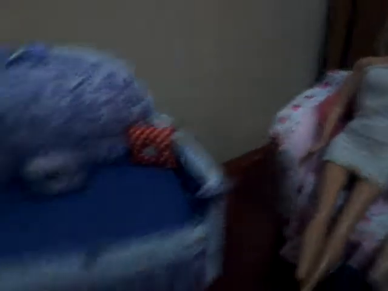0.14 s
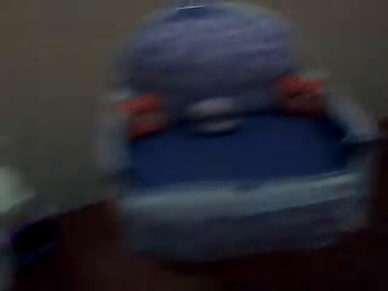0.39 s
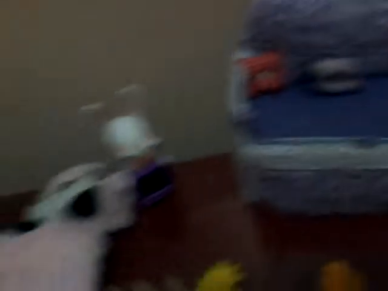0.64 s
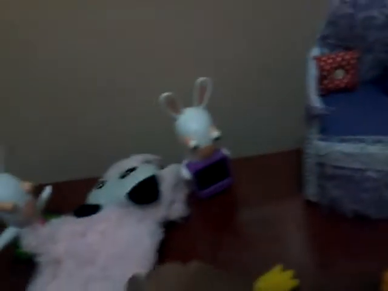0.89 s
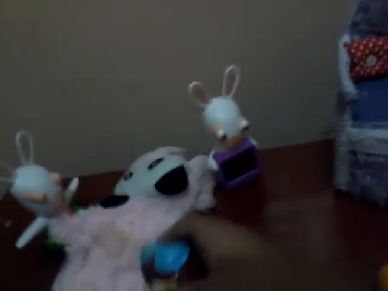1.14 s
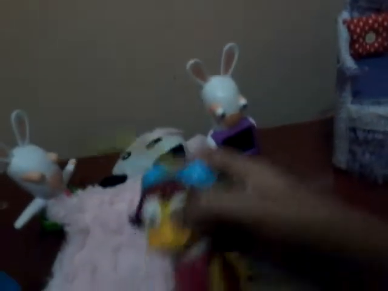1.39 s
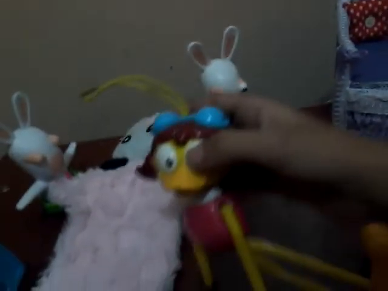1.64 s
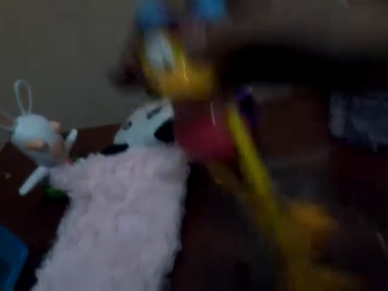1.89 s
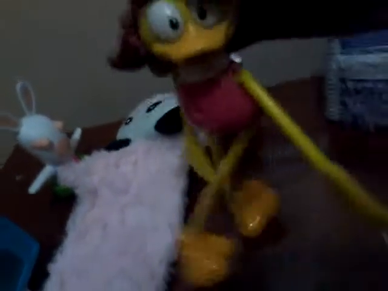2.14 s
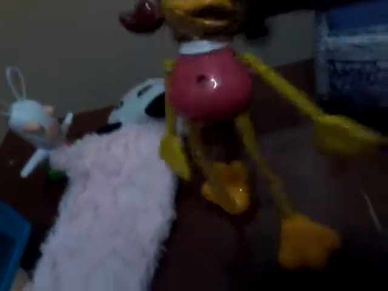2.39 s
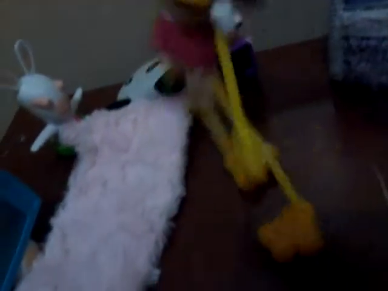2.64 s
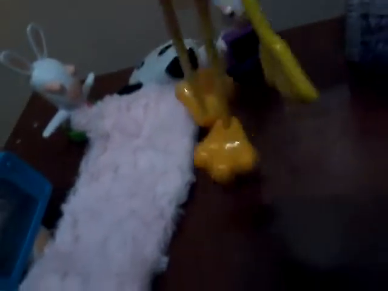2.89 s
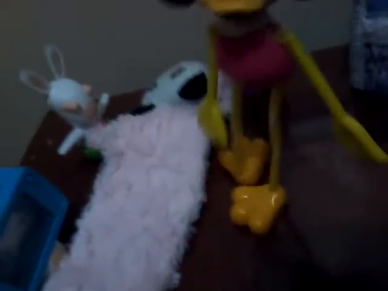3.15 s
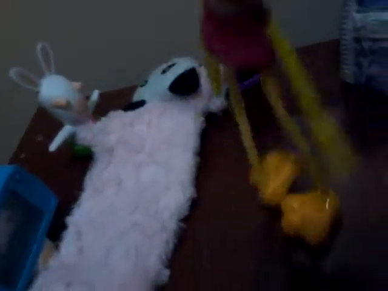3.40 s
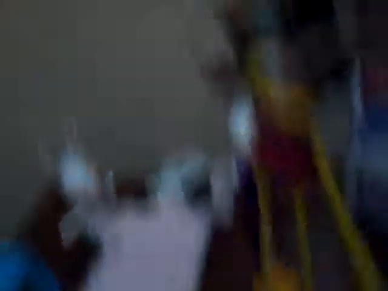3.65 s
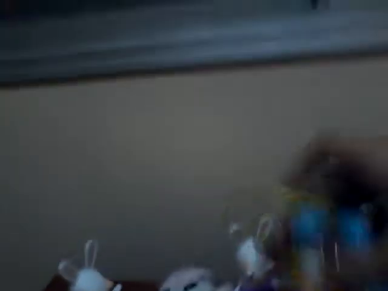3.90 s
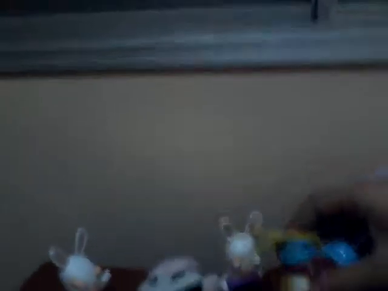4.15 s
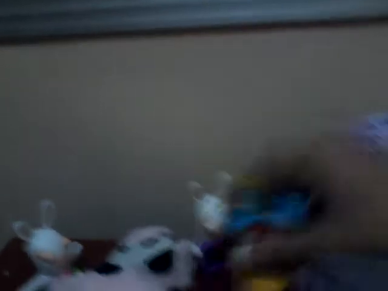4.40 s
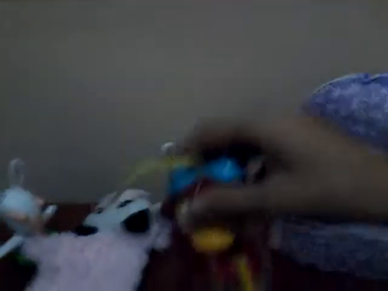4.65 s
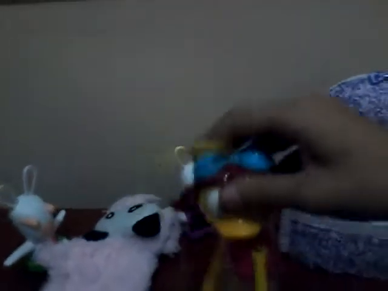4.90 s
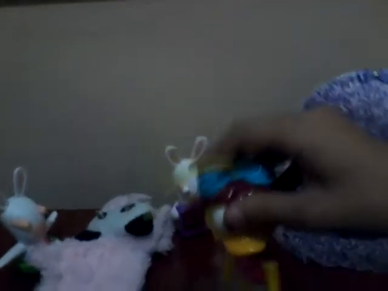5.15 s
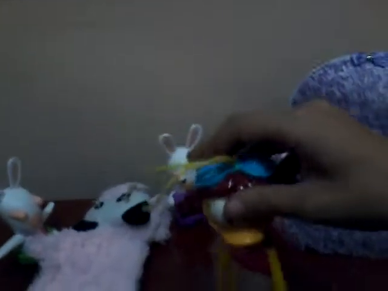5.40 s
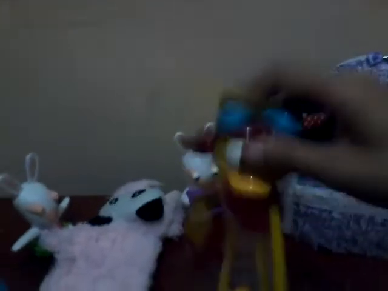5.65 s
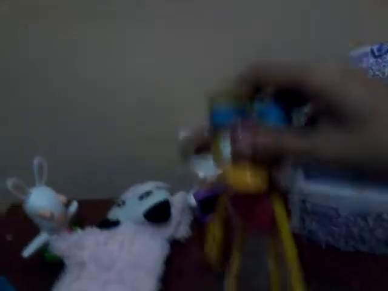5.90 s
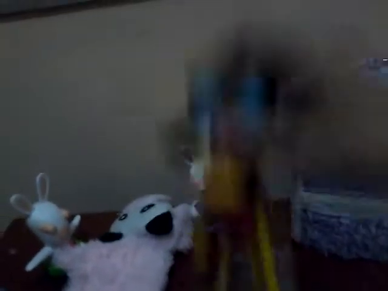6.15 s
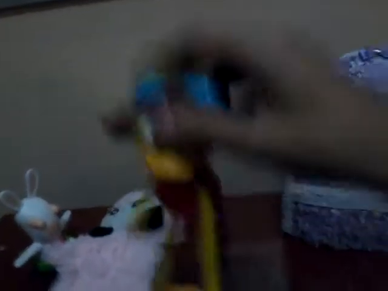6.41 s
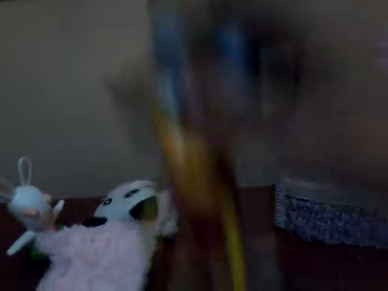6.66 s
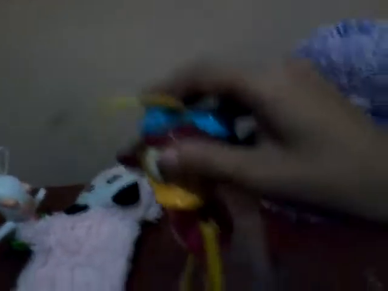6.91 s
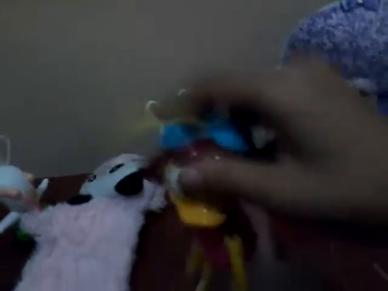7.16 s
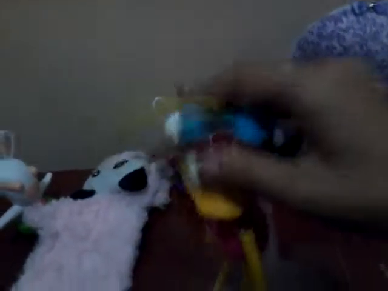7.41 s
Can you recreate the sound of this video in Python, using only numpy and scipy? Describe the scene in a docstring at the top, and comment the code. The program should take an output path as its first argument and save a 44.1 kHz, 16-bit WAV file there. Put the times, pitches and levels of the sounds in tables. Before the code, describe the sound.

Soft rubbing and a few light ticks, then brisk clattering steps of a jointed plastic toy on a table top, close up, over faint hiss.

```python
"""A dangling plastic toy is lifted and walked on a wooden table close to a small camera in a hard, small room.
Low tones hum outside from the start, over preamplifier hiss and a swelling wash of traffic: filtered noise.
Hand and plush then rub softly (noise bands), and limbs and table begin to knock as struck, decaying modes.
A thin scrape passes and a distant engine speeds up, as a sum of harmonics, then drops away.
Steps follow in clusters: hard ticks, the clack of hollow plastic and the knock of the table top."""
import sys
import numpy as np
from scipy import signal
from scipy.fft import rfft, irfft, next_fast_len
from scipy.io import wavfile
from scipy.ndimage import map_coordinates

SR = 44100
rng = np.random.default_rng(int(sys.argv[2]) if len(sys.argv) > 2 else 0)


def store_pcm(level_fs):
    """Save levels as 16-bit WAV."""
    pcm = np.round(np.clip(level_fs, -1, 1) * 32767).astype(np.int16)
    wavfile.write(sys.argv[1], SR, np.atleast_2d(pcm).T)


def makeup_ratio(level_db):
    """Linear amplitude ratio for a level in decibels (20 dB per factor of ten)."""
    decades = np.asarray(level_db, float) / 20
    return 10 ** decades


N = 332514


def unit(x):
    """Normalization of mean power: rms 1."""
    return x / np.sqrt(np.mean(x ** 2) + 1e-20)


def along(points, hz):
    """Interpolation on a logarithmic frequency axis, the scale of pitch."""
    point_hz, value = np.transpose(points)
    return np.interp(np.log(hz + 1), np.log(point_hz + 1), value)


def wobble(rate):
    """Slow random modulation: a smooth curve through normal random knots, rate of them a second."""
    knots = rng.standard_normal(N // 100)
    return map_coordinates(knots, [np.arange(N) * rate / SR])


def noise(spectrum):
    """Spectral shaping: white noise weighted in frequency, then scaled to rms 1."""
    white = rfft(rng.standard_normal(next_fast_len(N)))
    hz = np.linspace(0, SR / 2, len(white))
    return unit(irfft(white * makeup_ratio(along(spectrum, hz)))[:N])


def swell(start, length, rise, fall):
    """Amplitude envelope: rises from start, holds until start + length and then falls (all in s)."""
    t = np.arange(N) / SR - start
    ramp = np.minimum(t / rise, 1 + (length - t) / fall)
    return np.clip(ramp, 0, 1) ** 2


def preamplifier_hiss():
    """Stationary random noise with a fixed spectrum."""
    # hiss spectrum: frequency_hz, relative_density_db
    hiss_spectrum = [(30, -17.5), (120, 7.5), (500, -4), (2000, -10.5), (6000, -15.5), (14500, -13.5),
                     (15200, -46)]
    return makeup_ratio(-64) * noise(hiss_spectrum)


def distant_hums():
    """Gliding tones: phase is the integral of frequency; level and phase waver at random."""
    # low hums: start_s, length_s, first_hz, last_hz, level_db
    hums = [(-0.99, 1.42, 136, 141, -68), (0.73, 2.4, 96, 99.5, -61), (1.1, 3.4, 134, 169, -59.5)]
    rise_s, fall_s = 0.68, 0.32
    t = np.arange(N) / SR
    total = 0
    for s, length, first_hz, last_hz, db in hums:
        hz = np.interp(t, [s, s + length], [first_hz, last_hz])
        phase = 2 * np.pi * np.cumsum(hz) / SR + .8 * wobble(9)
        tone = makeup_ratio(db + 2.5 * wobble(7)) * np.sin(phase)
        total = total + swell(s, length, rise_s, fall_s) * tone
    return total


def traffic_wash():
    """Many incoherent sources add up to noise, here with a slowly changing level."""
    # traffic through the window: time_s, level_db
    wash_level = [(0, -89), (1.5, -62), (2.5, -60), (3.5, -58.5), (5.5, -63.5), (6.2, -80), (7.54, -69.5)]
    # its spectrum: frequency_hz, relative_density_db
    traffic_spectrum = [(30, -28.5), (70, -18), (150, 0.5), (380, -2.5), (700, -13.5), (1900, -13.5),
                        (2600, -14), (4000, -43.5)]
    level_db = np.interp(np.arange(N) / SR, *np.transpose(wash_level))
    return makeup_ratio(level_db + 0.89 * wobble(12)) * noise(traffic_spectrum)


def rubbing():
    """Friction noise: stick-slip makes the drag on wood grainy; the swish is smoother."""
    # strokes of hand and plush: start_s, length_s, drag_db, swish_db
    strokes = [(0.563, 0.12, -75, -60.5), (0.684, 1.6, -72, -71.5), (0.792, 0.043, -51, -77),
               (1.104, .15, -48.5, -61), (1.28, 0.19, -59.5, -69), (1.792, .18, -50, -59.5),
               (2.017, .1, -61, -53.5), (2.238, 0.2, -43.5, -52.5), (2.639, 0.24, -52.5, -64),
               (2.9, 0.17, -71, -67.5)]
    # drag on wood: frequency_hz, relative_density_db
    drag_spectrum = [(150, -57), (300, -12), (420, 5), (600, -2), (900, -7.5), (1500, -14), (2200, -19.5),
                     (3500, -31.5), (7000, -85)]
    # swish: frequency_hz, relative_density_db
    swish_spectrum = [(1500, -38.5), (3500, -8.5), (5000, -5.5), (6000, 1), (7200, -9.5), (14000, -17.5)]
    rise_s, fall_s = 0.059, 0.086
    press = sum(makeup_ratio([[drag_db], [swish_db]]) * swell(s, length, rise_s, fall_s)
                for s, length, drag_db, swish_db in strokes)
    drag = unit(makeup_ratio(2.5 * wobble(90)) * noise(drag_spectrum))
    swish = unit(makeup_ratio(1.5 * wobble(150)) * noise(swish_spectrum))
    return press[0] * drag + press[1] * swish


def contacts():
    """Impact excitation as (s, hardness dB, tick dB, clack dB, knock dB): hard blows favour the treble.
    None = that part stays still."""
    # feet land on the table and ring everything: time_s, clack_db, hardness_db (tick over clack)
    steps = [(0.7824, -18, -1.5), (2.2213, -7.5, -11), (2.2736, -6.5, -16.5), (2.3271, -15.5, 7),
             (2.3895, -27, 8.5), (2.4344, -21, 2), (2.6524, -18.5, -13.5), (2.7033, -33, 7.5),
             (3.104, 4.5, -5), (3.1176, 1, 0), (3.1309, 8, 1), (3.1463, -7.5, 5), (3.1807, -6, -4.5),
             (3.2386, -13.5, -9), (3.2638, -20.5, 2), (3.4278, -1.5, 4), (3.434, -9.5, 1.5),
             (3.4436, 4, 2.5), (3.4633, -1.5, -29.5), (3.5867, -7, -2), (3.7453, -18, -10.5),
             (3.7773, -7.5, 7), (3.8089, -4.5, -2), (4.0251, -1, 5.5), (4.034, -6, 16), (4.0406, 5, -22),
             (4.0482, -9, 10), (4.0565, 5, 1), (4.4782, -2.5, 0), (4.4985, 4.5, 5.5), (4.51, 4, 3.5),
             (4.5334, -3, 4), (4.6163, -11, 4), (4.6516, -20, -1), (4.9073, -6, -8), (4.9183, -4, 0.5),
             (4.96, -8.5, -8), (5.0365, -4, 2), (5.1227, -7.5, 2), (5.1974, -20, 5.5), (5.222, -5, -13.5),
             (5.2316, -1.5, -1.5), (5.2458, -1.5, -0.5), (5.593, -6.5, -1.5), (5.5998, 1, 4.5),
             (5.7225, -10.5, -6.5), (5.7978, -3.5, -12.5), (5.8179, 7.5, 6), (5.8315, 10.5, -5),
             (5.8575, -8.5, 6), (5.9383, -10, -29.5), (6.2684, 4.5, -1.5), (6.2812, 0.5, 7.5),
             (6.3005, 5, 5), (6.316, -0.5, 1), (6.7882, 6, 3.5), (6.801, 9, 3), (6.8165, 1, 0.5),
             (6.8346, -6.5, 9), (7.1995, -4, -3.5), (7.2181, 2.5, -5), (7.2239, 2, 2.5), (7.3463, 4, -11),
             (7.3516, 6.5, 3), (7.4932, -1, -2), (7.51, 10.5, -2)]
    # swinging limbs touch each other in the air: time_s, tick_db
    touches = [(0.7708, -15.5), (1.0354, -41), (1.043, -30.5), (1.06, -39), (1.727, -38.5), (1.994, -4.5),
               (2.051, -20), (2.082, -15), (2.45, -31), (2.7816, -10.5), (2.8317, 4), (2.9641, -13.5),
               (2.972, -20.5), (3.5802, -11), (3.958, -30), (4.0109, -11.5), (4.2373, -17), (4.4615, -18.5),
               (4.8846, -17.5), (4.687, -20), (5.141, -9.5), (5.3152, -15.5), (5.4086, -22),
               (5.5015, -29.5), (5.6891, -8.5), (5.7656, -5.5), (6.2465, -24.5), (6.66, -40),
               (6.705, -39.5), (6.7454, -29), (6.768, -11.5)]
    # dull bumps on the table top: time_s, knock_db
    bumps = [(0.7588, -13), (.976, -34.5), (1.6388, -22), (1.6918, -25), (2.39, -11), (2.8196, -9.5),
             (3.7709, -3), (4.2528, -25.5), (5.071, -2), (5.7862, 6)]
    table_db, table_per_hard = -3, 0.033  # knock over clack; softer steps move the table more
    touch_clack_db, bump_clack_db, bump_hard_db = -13.5, -10.5, -14
    rattle_gap_s, rattle_db, rattle_spread_db, rattle_fade_db_per_s = .016, -15, 7.5, 140.5
    rows = [(s, hard, db + hard, db, db + table_db - table_per_hard * hard) for s, db, hard in steps]
    rows += [(s, 0, db, db + touch_clack_db, None) for s, db in touches]
    rows += [(s, bump_hard_db, None, db + bump_clack_db, db) for s, db in bumps]
    # loose parts tick on twice after each step
    delays_s = rattle_gap_s * rng.exponential(size=(len(steps), 2)).cumsum(axis=1)
    sizes = rng.standard_normal((len(steps), 2))
    for (s, db, hard), step_delays, step_sizes in zip(steps, delays_s, sizes):
        for delay, size in zip(step_delays, step_sizes):
            fade_db = rattle_fade_db_per_s * delay
            tick_db = db + hard + rattle_db - fade_db + rattle_spread_db * size
            rows.append((s + delay, 0, tick_db, None, None))
    return rows


def ring(modes, tilt_db=0):
    """Modal synthesis: decaying sines, varied a little by every blow, each result of energy 1.
    Heard close with the chatter of the contact, and as the plain sum that fills the room."""
    hz, db, t60 = np.transpose(modes)[:, :, None]
    t = np.arange(4096) / SR
    luck = rng.standard_normal((2, len(modes), 1))
    db = db + 2.8 * luck[0] + tilt_db * np.log2(hz / hz[0])  # tilt in dB per octave
    hz = hz * (1 + .03 * luck[1])
    sign = (-1) ** np.arange(len(modes))[:, None]
    tones = makeup_ratio(db - 60 * t / t60) * np.sin(2 * np.pi * hz * t) * sign
    # chatter dies fast at first, then slowly; the first touch stands out of it
    chatter = makeup_ratio(-60 * t[:1024] / 0.0082) + makeup_ratio(-9.5 - 60 * t[:1024] / 0.067)
    push = rng.standard_normal((len(modes), 1024)) * chatter
    push[:, 0] = makeup_ratio(16.5)
    near = signal.fftconvolve(tones, push, axes=1)[:, :len(t)].sum(axis=0)
    both = np.array([near, tones.sum(axis=0)])
    return both / np.linalg.norm(both, axis=1, keepdims=True)


def room_tail():
    """Diffuse reverberation of energy 1: it builds up, then each frequency decays at its own rate."""
    # small hard room: frequency_hz, t60_s
    decay_times = [(150, .28), (400, .21), (1000, .21), (3000, .235), (6000, .235), (12000, .21)]
    hz, t, z = signal.stft(rng.standard_normal(SR // 2), SR, nperseg=256)
    decay = makeup_ratio(-60 * t / along(decay_times, hz)[:, None])
    tail = signal.istft(z * decay, SR, nperseg=256)[1]
    build_up_s = 0.00091
    tail = tail * (1 - np.exp(-np.arange(len(tail)) / SR / build_up_s))
    return tail / np.linalg.norm(tail)


def toy():
    """Superposed impact responses: contacts ring small parts, limbs and table, convolved with the room."""
    # small hard parts: nominal_hz, relative_level_db, t60_s
    tick_modes = [(3900, -5, .003), (4700, -3, .0035), (5400, -1, .0045), (6100, 0, .004), (6800, -1, .004),
                  (7700, -6, .003), (8800, -10, .0025), (10300, -15, .002)]
    # hollow limbs: nominal_hz, relative_level_db, t60_s
    clack_modes = [(1268, -10, 0.044), (1410, -2.5, 0.007), (1867, -5.5, 0.019), (2212, 0, 0.0065),
                   (2950, 2.5, 0.0033), (3407, -4.5, 0.016)]
    # table top: nominal_hz, relative_level_db, t60_s
    knock_modes = [(354.6, 6, 0.036), (429, 22, 0.015), (547, -0.5, 0.051), (584, 5.5, 0.048),
                   (735, -1, 0.15), (839, 5.5, 0.072), (1093, 5.5, 0.052)]
    # table legs and floor: nominal_hz, relative_level_db, t60_s
    thud_modes = [(102, -3, 0.053), (141, -10, 0.031), (219, 0, 0.012)]
    wet_db, thud_db = -1, -15  # room over direct sound; thud under a knock
    dull_per_soft = 0.55  # clack tilt in dB per octave for each dB of softness
    out, thuds = np.zeros((2, N + 2 * SR))
    tails = [room_tail() for _ in range(12)]  # contacts take them in turn
    for k, (s, hard, *levels) in enumerate(contacts()):
        tilts = (0, dull_per_soft * min(hard, 0), 0)
        parts = zip(levels, (tick_modes, clack_modes, knock_modes), tilts)
        near, plain = sum(makeup_ratio(db) * ring(modes, tilt_db) for db, modes, tilt_db in parts if db is not None)
        wet = makeup_ratio(wet_db) * signal.fftconvolve(plain, tails[k % len(tails)])
        at = round(s * SR)
        out[at:at + len(near)] += near
        out[at:at + len(wet)] += wet
        knock_db = levels[-1]
        if knock_db is not None:
            thuds[at:at + len(near)] += makeup_ratio(knock_db + thud_db) * ring(thud_modes)[0]
    # things this small radiate almost no bass, and soft plastic little of the top treble
    small_band = signal.butter(4, [320, 10500], "band", fs=SR, output="sos")
    thud_band = signal.butter(2, [85, 300], "band", fs=SR, output="sos")
    return signal.sosfilt(small_band, out[:N]) + signal.sosfilt(thud_band, thuds[:N])


def thin_scrape():
    """Narrow-band noise: friction confined to two narrow bands half sings."""
    # scrape: frequency_hz, relative_density_db
    scrape_spectrum = [(1500, -52), (1900, -7), (2150, -27), (2320, -4), (2500, -20), (3200, -45)]
    envelope = swell(1.46, 0.15, .03, .07)
    return envelope * makeup_ratio(-67 + 2.5 * wobble(30)) * noise(scrape_spectrum)


def distant_engine():
    """Harmonic synthesis: orders of one rising rate, each wavering on its own, as the engine pulls away."""
    # engine orders: multiple, relative_level_db
    orders = [(5, -6.5), (6, -3), (7, 1.5), (8, -2.5), (9, -7.5)]
    start_s, length_s, rise_s, fall_s = 1.75, 2.53, .4, 0.069
    start_hz, gain_hz_per_s = 35.9, 8.2  # base rate at start_s and its climb
    t = np.arange(N) / SR
    turn = 2 * np.pi * np.cumsum(start_hz + gain_hz_per_s * (t - start_s)) / SR
    engine = sum(makeup_ratio(db + 3 * wobble(5)) * np.sin(k * turn + .45 * wobble(8)) for k, db in orders)
    return makeup_ratio(-60) * swell(start_s, length_s, rise_s, fall_s) * engine


def scene():
    """Linear superposition: every source adds at one microphone."""
    outside = distant_hums() + traffic_wash() + distant_engine()
    return (outside + rubbing() + toy() + thin_scrape())[None]


def top_cut(x):
    """Nothing passes above the cut-off."""
    return signal.sosfilt(signal.butter(12, 15000, fs=SR, output="sos"), x)


def record(dry):
    """Amplifier saturation: hiss is added and the loudest peaks are rounded off."""
    noisy = dry + preamplifier_hiss()
    mix = noisy / (1 + np.abs(noisy) ** 8) ** (1 / 8)
    return top_cut(mix)


dry = scene()
out = record(dry)
store_pcm(out)
```